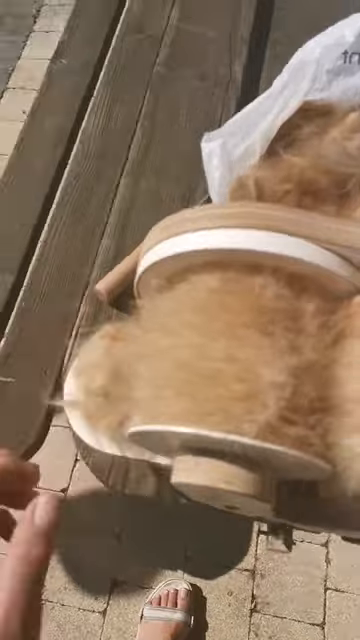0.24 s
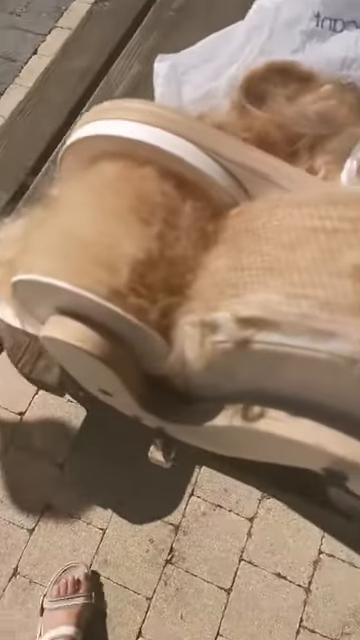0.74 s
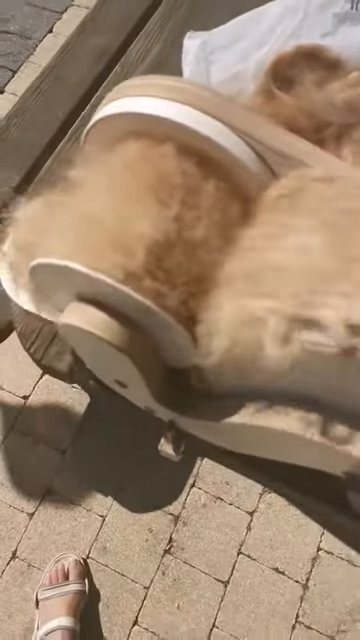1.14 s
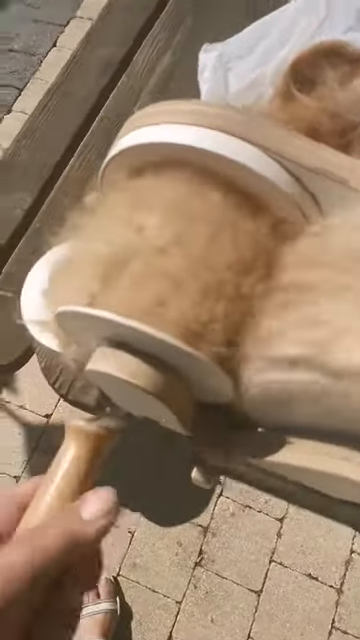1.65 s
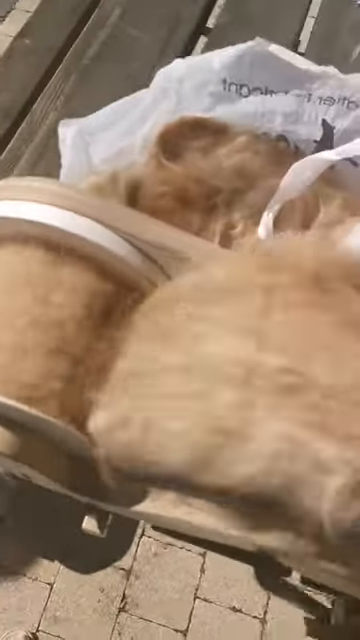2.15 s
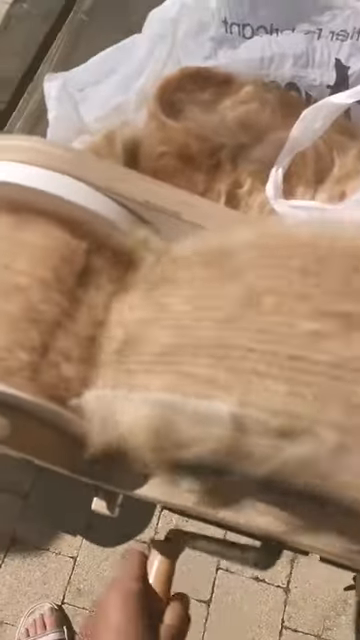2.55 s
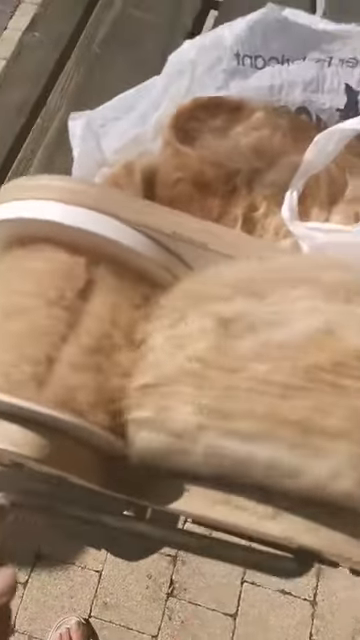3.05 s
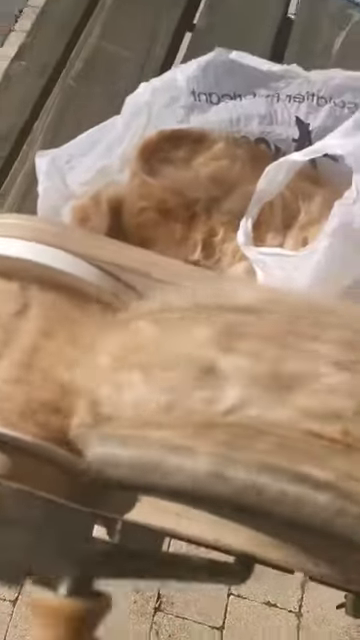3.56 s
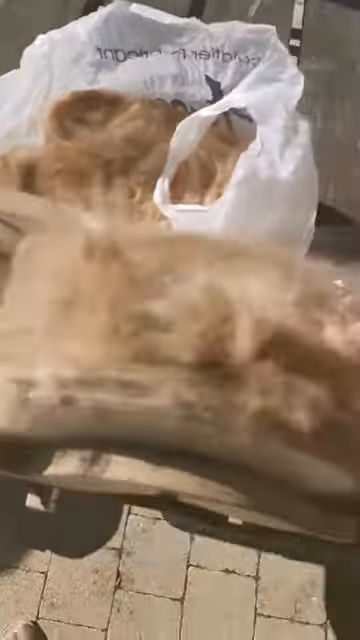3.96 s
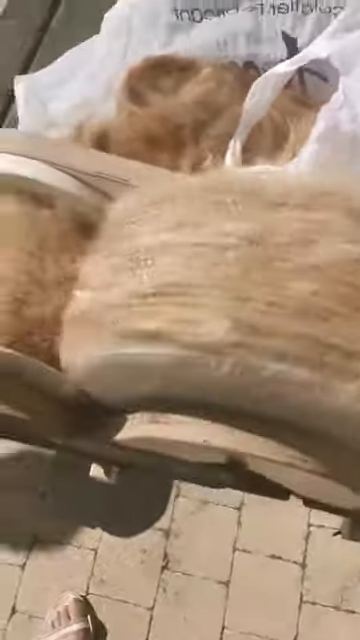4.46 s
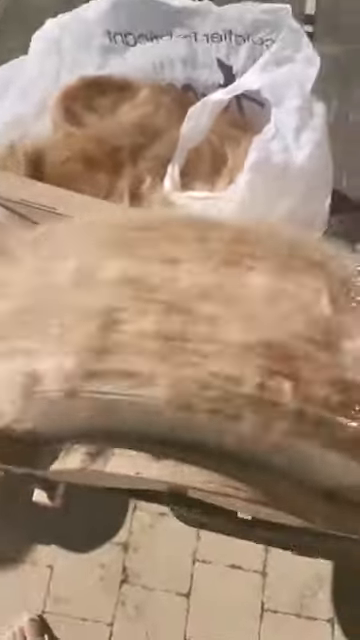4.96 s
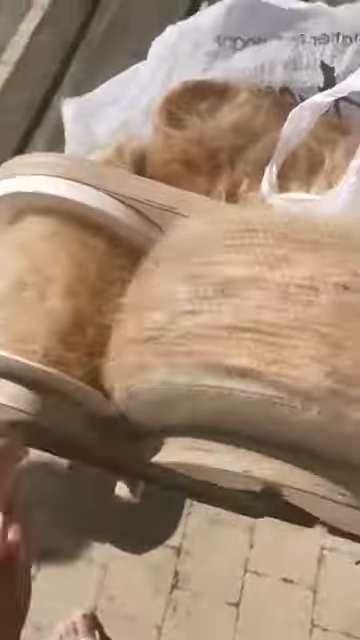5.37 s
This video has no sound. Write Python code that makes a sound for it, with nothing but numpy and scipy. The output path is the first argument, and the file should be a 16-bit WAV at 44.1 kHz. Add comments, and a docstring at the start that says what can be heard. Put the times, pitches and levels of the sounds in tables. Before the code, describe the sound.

Dry, scratchy ripping of fur on a turning toothed drum, starting after a near-quiet second, with snapping ticks, woody rumble and low gusts.

```python
"""Hand-cranked carding drum outdoors

A carding drum turns on a bench, heard by two microphone ports. One pull on the crank sets the level of
the tearing noise of the wire teeth, its high fizz and the rumble of the wooden frame's resonances.
Short pitched bursts are snapping teeth, and pushes into the frame's resonances are its knocks.
A hand brushes fur off the wires and the loose handle taps, over gusty wind and a distant hush.
There are also single low thuds, some from gusts and some groans of the frame.
"""
import sys
import numpy as np
from scipy import signal
from scipy.fft import rfft, irfft, next_fast_len
from scipy.io import wavfile
from scipy.ndimage import uniform_filter1d, map_coordinates

SR = 44100
rng = np.random.default_rng(int(sys.argv[2]) if len(sys.argv) > 2 else 0)


def transcribe(signal):
    """Save signal, clipped to [-1, 1], as a 16-bit WAV file at the path in sys.argv[1]."""
    frames = np.atleast_2d(signal).T
    limited = np.clip(frames, -1, 1)
    pcm = np.round(limited * 32767).astype(np.int16)
    wavfile.write(sys.argv[1], SR, pcm)


N = 247401

# tone colour of the wire teeth, before the levels are set: pitch_hz [Hz], level_db [relative dB]
TEETH_COLOUR = [(400, -17), (950, -12.5), (1270, -13.5), (1600, -8), (1950, -10.5), (2400, -5.5),
                (3100, -9), (3900, -13), (4700, -13.5), (5800, -3), (6600, -6), (7500, -1), (7950, -9.5),
                (8250, -18.5), (9200, -21.5), (10300, -27.5), (11500, -35), (14300, -30), (15700, -56)]
APART = signal.butter(1, 1500, "high", fs=SR)  # above this many Hz the ports hear unlike detail
SIDES = np.array([[0.5], [-0.5]])  # shares a left-right difference in dB between the two ports


def gain_of(db):
    """Decibels to amplitude."""
    return 10 ** (np.asarray(db) / 20)


def evened(x):
    """Scaled to an average (rms) level of 1."""
    return x / np.sqrt(np.mean(x ** 2) + 1e-20)


def read(points, hz):
    """Reads a table of values by pitch, with pitch on a log scale."""
    f, value = np.transpose(points)
    return np.interp(np.log(hz + 1), np.log(f + 1), value)


def follow(points):
    """Turns a table of values by time into a curve, sample by sample."""
    s, value = np.transpose(points)
    return np.interp(np.arange(N) / SR, s, value)


def peaked(start, length, db, rise_db_per_s, fall_db_per_s):
    """A level in dB that climbs, holds and falls."""
    t = np.arange(N) / SR
    climb = rise_db_per_s * np.maximum(start - t, 0)
    fall = fall_db_per_s * np.maximum(t - start - length, 0)
    return db - climb - fall


def burst(t, rise):
    """Quick swell and fall, peak 1 after the rise time."""
    return (t / rise * np.exp(1 - t / rise)) ** 2


def colour(x, points):
    """Filters with the gains of a table, without sounding ahead of the input (minimum phase)."""
    log_gain = np.log(gain_of(read(points, abs(np.fft.fftfreq(4096, 1 / SR)))))
    response = np.exp(np.conj(signal.hilbert(log_gain)))
    impulse = np.fft.ifft(response).real[:2048]
    return signal.oaconvolve(x, impulse[None], axes=1)[:, :N]


def band(x, lo_hz, hi_hz):
    """Keeps the pitches between two limits."""
    return signal.sosfilt(signal.butter(4, [lo_hz, hi_hz], "bandpass", fs=SR, output="sos"), x)


def below(x, hz):
    """Keeps the part under a pitch, without delay."""
    size = next_fast_len(N)
    loss = 1 + (np.fft.rfftfreq(size, 1 / SR) / hz) ** 12
    return irfft(rfft(x, size) / loss, size)[..., :N]


def resonate(x, hz, width_hz):
    """One resonance: it rings at its pitch, longer when it is narrow."""
    return signal.lfilter(*signal.iirpeak(hz, hz / width_hz, SR), x)


def drift(cutoff_hz, channels=1):
    """Slow random wandering: low-passed noise of rms 1."""
    low_pass = signal.butter(2, cutoff_hz, fs=SR, output="sos")
    return evened(signal.sosfilt(low_pass, rng.standard_normal((channels, N))))


def add(mix, s, sound):
    """Mixes a sound in at a time."""
    part = mix[:, round(s * SR):][:, :sound.shape[1]]
    part += sound[:, :part.shape[1]]


def scrape(t60, apart, size, rise=0.0015):
    """A swelling, dying burst of noise; towards the treble the ports hear unlike detail."""
    shared, left, right = rng.standard_normal((3, size))
    own = signal.lfilter(*APART, [left, right])
    t = np.arange(size) / SR
    return (shared + apart * own) * gain_of(-60 * t / t60) * (1 - np.exp(-t / rise)) ** 2


def grains(per_s, spread_db, clump_db, t60, apart, wiry=0.0, count=16):
    """Random ticks of unequal size, stronger in clumps; a wiry tick also rings at a pitch."""
    size = gain_of(spread_db * np.minimum(rng.exponential(1, N), 3.5) + clump_db * drift(13.7)[0])
    size *= rng.random(N) < per_s / SR
    kind, out = rng.integers(0, count, N), np.zeros((2, N))
    for k, hz in enumerate(np.geomspace(1100, 8000, count)):
        tick = scrape(t60, apart, size=1024)
        tick = tick + wiry * resonate(tick, hz, 250)
        out += signal.oaconvolve((size * (kind == k))[None], tick, axes=1)[:, :N]
    return evened(out)


def pull_db():
    """Level of the tearing: the cranking or a nudge, whichever is stronger."""
    # how hard the teeth tear as the hand cranks, with one stop: time_s [s], teeth_db [dB]
    turning = [(0.12, -80.5), (0.6, -70.5), (1.14, -69), (1.17, -56), (1.24, -49), (1.4, -45.5),
               (1.46, -51), (1.53, -49), (1.62, -46.5), (1.7, -45), (1.76, -43), (1.9, -43.5), (2.08, -39),
               (2.25, -50.5), (2.32, -42), (2.375, -63), (2.52, -71.5), (2.545, -53.5), (2.62, -40.5),
               (2.7, -46), (2.78, -43.5), (2.95, -44), (3.14, -46), (3.19, -54), (3.44, -40), (3.52, -53.5),
               (3.6, -44), (3.69, -43), (3.77, -47.5), (3.97, -43.5), (4.08, -45.5), (4.36, -49.5),
               (4.48, -43.5), (4.6, -47), (4.9, -46), (5.1, -40.5), (5.16, -45), (5.184, -50),
               (5.22, -42.5), (5.245, -54.5), (5.3, -43.5), (5.38, -43), (5.53, -45.5), (5.61, -48)]
    # the drum is nudged before the cranking: start_s [s], length_s [s], teeth_db [dB]
    nudges = [(0, 0.095, -64), (0.548, 0.024, -62.5), (0.648, 0.07, -59.5), (0.806, 0.013, -49.5),
              (0.86, 0.006, -51)]
    levels = [follow(turning)]
    for start, length, db in nudges:
        levels.append(peaked(start, length, db, rise_db_per_s=900, fall_db_per_s=300))
    return np.max(levels, axis=0)


def tufted(x):
    """Random patches of level in time and pitch: tufts of fur give way unevenly."""
    depth_db, length_s, width_hz = 2, 0.024, 350
    z = signal.stft(x, nperseg=256, noverlap=192)[2]
    patches = rng.standard_normal(z.shape[1:])
    patches = uniform_filter1d(patches, max(round(width_hz * 256 / SR), 1), 0)
    patches = evened(uniform_filter1d(patches, max(round(length_s * SR / 64), 1), 1))
    return signal.istft(z * gain_of(depth_db * patches), nperseg=256, noverlap=192)[1][:, :N]


def teeth():
    """Wire teeth tear through fur: dense rustle and short ticks, split into a body and a high fizz."""
    # high fizz of the wires against the teeth level: time_s [s], fizz_db [dB]
    fizz_curve = [(0, 2.5), (.9, 1), (1.17, -4), (1.4, 0.5), (1.6, -2.5), (2.0, 3.5), (2.6, 0), (3.3, -0.5),
                  (3.62, -4), (4.08, 1.5), (4.38, -4.5), (4.48, -2.5), (4.72, -7), (5.0, -0.5), (5.4, 0.5),
                  (5.55, -7)]
    teeth_db = pull_db()
    fizz_db = teeth_db + follow(fizz_curve)
    rustle = grains(1600, 1.2, 1.3, 0.018, 1.0, wiry=5.0)
    ticks = grains(260, 3.0, 3.0, 0.006, 0.8, wiry=1.5)
    ticks -= 0.45 * (ticks - below(ticks, 4000))  # softer treble
    ticks += 2.06 * resonate(ticks, 1600, 69)  # ticks ring the tooth bed
    tearing = tufted(colour(rustle + gain_of(-2) * ticks, TEETH_COLOUR))
    low = below(tearing, 4000)
    high = tearing - low
    low /= np.std(band(low, 1000, 4000))
    high /= np.std(band(high, 5000, 8300))
    return gain_of(teeth_db) * low + gain_of(fizz_db) * high


def frame_rings(x):
    """The wooden frame's resonances, side by side with alternating sign."""
    # resonances of the frame: pitch_hz [Hz], width_hz [Hz], level_db [relative dB]
    modes = [(141.4, 27, -3.5), (267, 60, -0.5), (354, 55, 0), (482.6, 49, 1), (635, 100, 1),
             (970, 109, -1.5), (1560, 124, -6.5)]
    out = 0
    for k, (hz, width, db) in enumerate(modes):
        out = out + (-1) ** k * gain_of(db) / np.sqrt(width) * resonate(x, hz, width)
    return out


def rumble():
    """The pull also shakes the frame: its resonances ring over a broad woody scrape."""
    # frame rumble against the teeth level: time_s [s], rumble_db [dB]
    rumble_curve = [(0, 12.5), (.6, -50), (.9, 4), (1.3, -1), (1.9, 0), (2.2, -4.5), (2.6, -12), (2.8, -5),
                    (2.88, -5.5), (2.97, -5.5), (3.12, -7.5), (3.42, -10), (3.9, 0), (4.3, -0.5),
                    (4.52, -8), (5.0, 2), (5.12, -2), (5.3, 3), (5.61, -7)]
    shakes = grains(500, 0.44, 0.75, 0.036, 0.99, count=6)
    woody = evened(band(shakes, 543, 1270))
    level = gain_of(pull_db() + follow(rumble_curve))
    return level * evened(evened(frame_rings(shakes)) + 0.6 * woody)


def snaps():
    """A caught tooth lets go: a short tone, crack and wire ping, two rebounds and a faint rattle."""
    # snapping teeth: start_s [s], level_db [nominal dB], pitch_hz [Hz, before a small random shift],
    # fizz_db [nominal dB against the level]
    snap_list = [(0.004, -35, 2590, 13), (0.018, -38, 2400, 15), (0.025, -32.5, 2540, 12),
                 (0.039, -33, 2640, 5), (0.0957, -39.5, 2540, 7.5), (0.5611, -43, 1490, 11),
                 (0.714, -37, 3440, 12), (0.8406, -16, 2090, -6), (0.8454, -10, 1730, 2.5),
                 (0.846, -23, 3540, 9), (0.8529, -19, 1800, -2), (1.1575, -23.5, 1450, -2.5),
                 (1.218, -27, 2644, 0), (1.263, -20.5, 1540, -2), (1.3088, -18.5, 2060, 10),
                 (1.3955, -34, 1030, 14), (1.4332, -14.5, 1640, -5), (1.499, -17, 1998, -0.5),
                 (1.53, -39, 1080, 20), (1.63, -26.5, 970, 14.5), (1.645, -25, 2500, -6),
                 (1.6615, -29.5, 1450, 20.5), (1.675, -33, 3280, 13), (1.6867, -30, 1540, 14),
                 (1.715, -28.5, 1430, 17.5), (1.751, -30, 950, 10.5), (2.064, -18, 1560, -9),
                 (2.0898, -18, 1520, 3), (2.132, -29.5, 1530, 15.5), (2.537, -39, 3000, 12.5),
                 (2.576, -15.5, 1850, -1), (2.614, -45, 1580, 25), (2.723, -28.5, 1600, 3),
                 (2.82, -27.5, 1090, -9), (2.9238, -19, 2130, -22), (3.255, -38, 2830, 17.5),
                 (3.36, -27, 2430, 0), (3.3693, -29.5, 2390, 11.5), (3.557, -31, 1670, -10),
                 (3.635, -26, 1750, -14), (3.655, -23, 1660, -17), (3.711, -23.5, 1660, -22),
                 (3.917, -27.5, 1690, -9), (3.963, -23.5, 1570, -9), (3.995, -22, 1610, 4.5),
                 (4.001, -27, 1600, 8), (4.021, -28, 1560, 14.5), (4.056, -35.5, 1660, 23.5),
                 (4.073, -37.5, 1630, 22.5), (4.2366, -33.5, 2960, 16.5), (4.334, -31.5, 1470, 7.5),
                 (4.385, -30, 1520, 9.5), (4.498, -29, 1560, -1), (4.613, -30, 2370, 1),
                 (4.728, -25, 1710, -12), (4.7625, -16, 2410, -30), (4.863, -35, 1680, 15.5),
                 (4.944, -29, 1710, 7), (4.962, -25.5, 1315, -6), (5.0, -25, 1600, -7),
                 (5.024, -32, 1600, 14.5), (5.0747, -23.5, 1540, 7), (5.091, -27, 1068, 16.5),
                 (5.1072, -20, 2890, 6), (5.125, -23.5, 1600, 10), (5.15, -29, 1600, 9),
                 (5.1685, -31, 1350, 25), (5.17, -33, 2390, 23.5), (5.2018, -37, 1040, 22),
                 (5.214, -19, 1630, 4), (5.22, -17.5, 960, -7), (5.227, -32, 1507, 14),
                 (5.259, -26, 1600, -5), (5.2714, -27.5, 1730, 15.5), (5.291, -27, 2500, 6),
                 (5.315, -30, 2500, 13), (5.373, -21, 1560, 8), (5.3965, -25, 1560, 0),
                 (5.4025, -24.5, 1560, 6)]
    # where the wires ring: pitch_hz [Hz]
    wires_hz = [5770, 7400]
    body_rise_s, fizz_rise_s = 0.00088, 0.00105
    rebound_s, rebound_db = 0.0036, -8.5  # typical gap and loss from one bounce to the next
    overtone, overtone_db = 1.55, -10  # pitch ratio and level against the main tone
    body, fizz, t = np.zeros((2, N)), np.zeros((2, N)), np.arange(512) / SR
    for s, db, hz, fizz_db in snap_list:
        rattle_t60 = 4.7 * 0.013 * np.exp(-0.05 * (db + 43))  # seconds; louder snaps rattle shorter
        rattle = band(scrape(rattle_t60, 0.32, size=4096), 0.5 * hz, 2.1 * hz)
        add(body, s, gain_of(db) * 0.15 * rattle)
        hiss = scrape(0.015, 1.0, size=1024, rise=0.0012)
        add(fizz, s, gain_of(db + fizz_db) * 0.51 * hiss)
        crack_noise = scrape(100, 0.4, size=1536, rise=1e-5)
        cracks = evened(band(crack_noise, 0.41 * hz, 2.27 * hz)).reshape(2, 3, 512)
        for bounce in range(3):  # the snap itself, then two rebounds
            late, pitch, turn, level = rng.random(4)
            at = s + bounce * rebound_s * (0.88 + 0.31 * late)
            force_db = db + bounce * (rebound_db + 3.4 * (level - 0.5))
            ring = 2 * np.pi * hz * (1 + 0.06 * (pitch - 0.5)) * t
            tone = np.sin(ring) + gain_of(overtone_db) * np.sin(overtone * ring + 2 * np.pi * turn)
            strike = 0.49 * tone + 0.12 * cracks[:, bounce]
            add(body, at, gain_of(force_db) * burst(t, body_rise_s) * strike)
            ping = sum(np.sin(2 * np.pi * (f * t + rng.random())) for f in wires_hz)
            spray = 0.13 * ping + 0.45 * scrape(1, 0.96, size=512, rise=1e-5)
            add(fizz, at, gain_of(force_db + fizz_db) * burst(t, fizz_rise_s) * spray)
    # thin out the bottom of the fizz and soften its very top
    thinned = 0.43 * (fizz + below(fizz, 11000)) - 0.88 * below(fizz, 3800)
    crackle = gain_of(-9) * band(fizz, 2760, 4280)
    return body + colour(thinned, TEETH_COLOUR) + crackle


def knocks():
    """The frame jolts: a short push and a rattle ring it, with a longer low shudder."""
    # jolts: start_s [s], blow_db [nominal dB], rattle_db [nominal dB against the blow], contact_ms [ms]
    jolt_list = [(0.849, -26.5, 0.5, 0.34), (1.155, -37.5, -10, 0.72), (1.504, -27, 2.5, 0.82),
                 (1.513, -31, -2.5, 1), (2.086, -35, 9.5, .7), (2.339, -27, -1, 0.83),
                 (4.272, -24.5, 2.5, 1), (4.325, -36, -7, 0.88), (5.073, -32, 2, 0.64),
                 (5.216, -25, -3.5, 0.44), (5.239, -30.5, 3, .9), (5.274, -23, -1, 0.71),
                 (5.283, -24, 2.5, 0.89), (5.322, -31, 6.5, .8), (5.339, -35.5, 5, .8)]
    jolts, blows, t60 = np.zeros((2, N)), np.zeros((2, N)), 0.13  # rattle's 60 dB decay in seconds
    for s, db, rattle_db, contact_ms in jolt_list:
        push = burst(np.arange(257) / SR, contact_ms / 3000)  # peaks after a third of the contact
        blow = np.diff(push) * np.ones((2, 1))
        blow /= np.linalg.norm(blow[0])
        rattle = scrape(t60, 0.31, size=8192, rise=0.0037)
        shudder = band(scrape(1.36 * t60, 0.19, size=8192, rise=0.012), 175, 426)
        shaking = 22.5 * rattle + 34.0 * contact_ms ** 2 * shudder  # longer contact, more shudder
        add(jolts, s, gain_of(db + rattle_db) * shaking)
        add(jolts, s, gain_of(db) * 117.0 * blow)
        add(blows, s, gain_of(db) * 1010.0 * blow)
    # the blow also passes on through the bench and rings longer: the resonances act on it twice
    return frame_rings(jolts + frame_rings(blows))


def brush():
    """A hand brushes fur off the wires: a short coloured rasp of dense ticks."""
    # loudness of the rasp: time_s [s], level_db [dB]
    rasp_curve = [(0, -41.5), (.05, -42), (.1, -58), (.115, -73)]
    # its tone colour: pitch_hz [Hz], level_db [relative dB]
    rasp_colour = [(300, -21), (650, 7), (1200, -24), (2700, 2), (4300, -22), (7500, -3), (8300, -14),
                   (15000, -44)]
    rasp = evened(colour(grains(1000, 2.4, 0.98, 0.0063, 0.79, count=6), rasp_colour))
    sounding = np.arange(N) < rasp_curve[-1][0] * SR  # silent after the last point
    return gain_of(follow(rasp_curve)) * rasp * sounding


def taps():
    """The loose crank handle taps its shaft: a soft push rings its modes, a little varied each time."""
    # taps: start_s [s], peak_db [dB, ahead of the ports]
    tap_list = [(1.028, -50), (1.043, -38), (1.074, -38), (1.114, -46.5)]
    # handle modes: pitch_hz [Hz], level_db [relative dB, varied at random], t60_s [60 dB decay, s]
    handle = [(950, -9, 0.041), (1520, 2, 0.017), (1830, 0, 0.014), (2130, 2.5, 0.022), (2660, -12, 0.0097),
              (3550, -6, 0.013)]
    out, t = np.zeros((2, N)), np.arange(2048) / SR
    for s, db in tap_list:
        ring = np.zeros(len(t))
        for hz, mode_db, t60 in handle:
            fading_db = mode_db + 3.2 * rng.standard_normal() - 60 * t / t60
            ring += gain_of(fading_db) * np.sin(2 * np.pi * (hz * t + rng.random()))
        ring = ring * (1 - np.exp(-t / 0.0012)) ** 2  # soft start
        add(out, s, gain_of(db) * np.array([ring, ring]) / abs(ring).max())
    return out


def ports(x):
    """The farther (left) port hears the machine later and shaded; long waves lag less."""
    # how much later the farther port hears the treble: time_s [s], lag_us [microseconds]
    lag_curve = [(0, 21), (2.1, 80), (2.3, 120), (3.6, 129), (5.61, 134)]
    # farther port against nearer port: pitch_hz [Hz], level_db [dB]
    shadow = [(200, -1), (500, 0), (1200, -5), (1700, -2), (3500, -1), (5800, -4), (7500, -7), (8200, -3.5),
              (12000, -1.5)]
    lag = follow(lag_curve) * 1e-6 * SR  # in samples
    low = below(x[0], 2960)
    late = 0
    for part, share in ((low, 0.45), (x[0] - low, 1)):
        late = late + map_coordinates(part, [np.arange(N) - share * lag], order=3)
    size = next_fast_len(N)
    # half the shading dims the far port, the other half lifts the near one
    shade = gain_of(read(shadow, np.fft.rfftfreq(size, 1 / SR)) / 2)
    return irfft(np.array([rfft(late, size) * shade, rfft(x[1], size) / shade]), size)[:, :N]


def wind():
    """Gusts buffet the ports: lumpy low noise, unrelated at the two ports."""
    # slowly changing wind under the gusts: time_s [s], level_db [dB]
    wind_curve = [(0, -73), (.94, -65), (2.0, -55.5), (3.2, -66), (4.1, -49.5), (5.61, -55)]
    # gusts: peak_s [s], level_db [dB], left_right_db [dB, left against right]
    gust_list = [(1.08, -61, -21), (1.29, -51.5, -10), (1.76, -50, -3), (2.2, -45.5, -13), (2.4, -49.5, -7),
                 (2.76, -44, -14.5), (2.9, -47, -1), (3.6, -51, -15), (4.2, -47, -18.5), (4.37, -46, 1.5),
                 (4.47, -44, -10), (4.54, -43, -7), (4.62, -48.5, -19), (4.72, -52, -4), (5.28, -43, 5),
                 (5.39, -38, -9), (5.48, -44.5, -10)]
    # tone colour of the wind: pitch_hz [Hz], level_db [relative dB]
    gust_colour = [(8.8, -68), (15, 0.5), (43, 1), (97, -5.5), (184, -19.5), (268, -22), (300, -55),
                   (390, -35), (660, -120)]
    level = gain_of(follow(wind_curve))
    for s, db, pan_db in gust_list:
        gust_db = peaked(s, 0, db, rise_db_per_s=103, fall_db_per_s=101)
        level = np.hypot(level, gain_of(gust_db + SIDES * pan_db))
    lumps = colour(rng.standard_normal((2, N)) * gain_of(7.2 * drift(26, channels=2)), gust_colour)
    # even out slow swells, so that these come from the level curve
    lumps /= np.sqrt(uniform_filter1d(lumps ** 2, size=6000, axis=1) + 1e-12)
    return lumps * level


def thuds():
    """Low thuds, some from gusts and some groans of the frame: cosines under a bell-shaped swell."""
    # thuds: peak_s [s], level_db [dB], pitch_hz [Hz], length_s [s, from the middle to 1/e],
    # left_right_db [dB, left against right]
    thud_list = [(1.073, -45.5, 55.3, 0.0071, -21), (1.285, -43.5, 136, 0.025, -1.5),
                 (1.75, -45, 125, 0.046, 0), (2.765, -40.5, 152, 0.0088, -9),
                 (4.359, -32.5, 76, 0.0058, -12), (4.457, -43, 89.5, .007, -17),
                 (4.478, -33, 96, 0.0035, -22), (4.525, -37, 60, 0.013, -6)]
    t, out = np.arange(-8192, 8192) / SR, np.zeros((2, N))
    for s, db, hz, length, pan_db in thud_list:
        swing = np.cos(2 * np.pi * (hz * t + rng.random())) * np.exp(-(t / length) ** 2)
        add(out, s + t[0], gain_of(db + SIDES * pan_db) * swing)
    return out


def air():
    """Distant outdoor hush: steady coloured noise, partly alike at the two ports."""
    # tone colour of the hush: pitch_hz [Hz], level_db [relative dB]
    hush_colour = [(24, -44), (40, -1), (96, 1), (167, -5), (189, 0.5), (249, -7.5), (290, -0.5),
                   (363, -7.5), (615, -10.5), (2840, -21.5), (3930, -22), (5000, -30), (6300, -40),
                   (7500, -11.5), (8200, -27), (10000, -35.5), (16000, -65)]
    # left-right likeness: pitch_hz [Hz], likeness [0 unrelated to 1 the same]
    likeness = [(60, 0.92), (180, 1), (550, 0.78), (1650, 0.65), (4970, 0.025), (15000, 1)]
    size = next_fast_len(N)
    shared, own = rfft(rng.standard_normal((2, size)))
    hz = np.fft.rfftfreq(size, 1 / SR)
    same = np.clip(read(likeness, hz), -1, 1)
    right = same * shared + np.sqrt(1 - same ** 2) * own
    hush = np.array([shared, right]) * gain_of(read(hush_colour, hz))
    return gain_of(-62.5) * evened(irfft(hush, size)[:, :N])


def scene():
    """Machine through the ports, with wind, thuds and air."""
    machine = teeth() + rumble() + brush() + snaps() + taps() + knocks()
    return ports(machine) + wind() + thuds() + air()


def record(dry):
    """Takes away the treble above about 16300 Hz."""
    low_pass = signal.firwin(511, 16300, window=("kaiser", 9), fs=SR)
    return signal.oaconvolve(dry, low_pass[None], "same")


dry = scene()
out = record(dry)
transcribe(out)
```